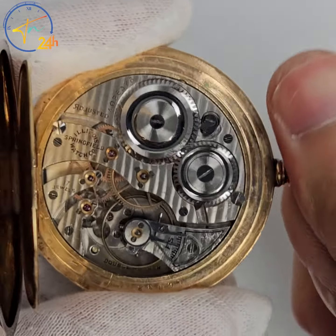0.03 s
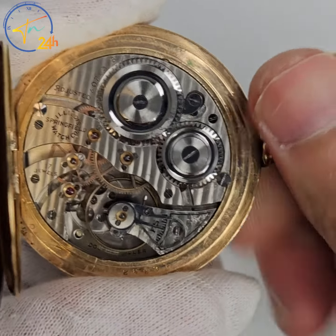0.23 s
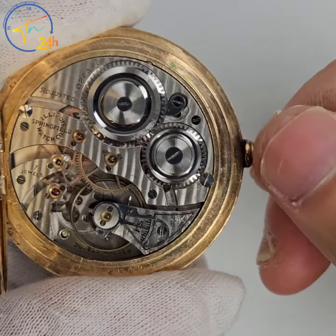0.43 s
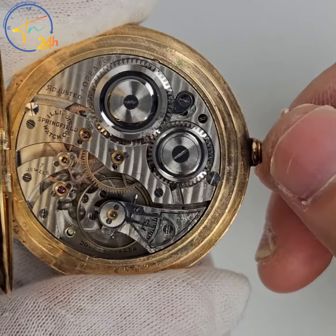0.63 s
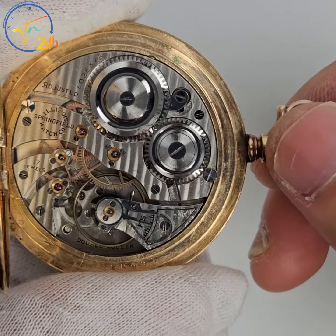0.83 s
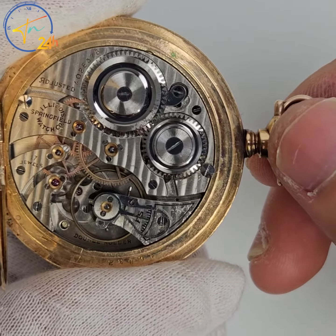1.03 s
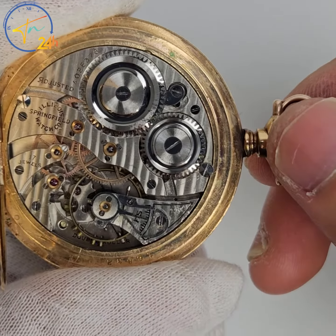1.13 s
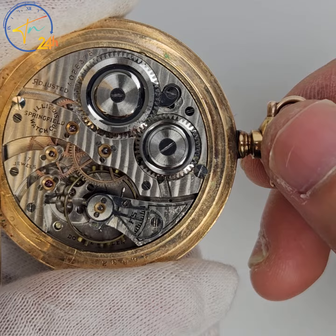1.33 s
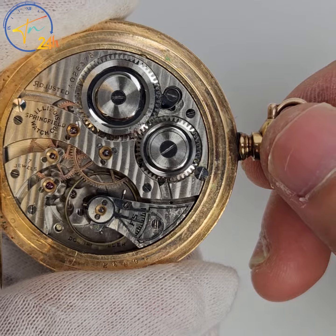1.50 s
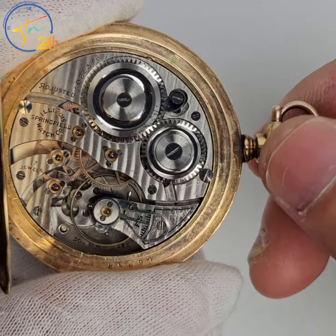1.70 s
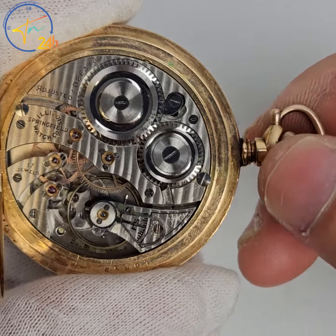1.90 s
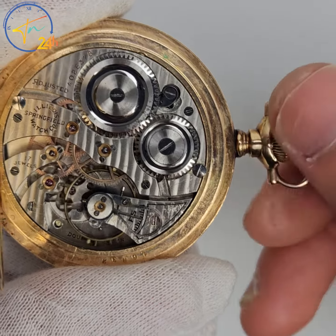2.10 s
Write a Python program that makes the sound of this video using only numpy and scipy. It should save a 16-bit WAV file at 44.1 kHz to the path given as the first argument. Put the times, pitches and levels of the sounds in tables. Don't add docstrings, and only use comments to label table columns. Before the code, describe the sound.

A metal pocket watch is handled close to a stereo microphone in a quiet room. Soft finger rubbing leads to a loud, sharp crown snap at 0.17 s, with a brief bright case ring. Faint, fast, overlapping ticks continue over low ventilation hum and thin hiss. At 1.70 and 1.87 s the loose bow makes two much quieter metallic knocks, with light touches and a barely audible distant bell-like tone from 1.74 s.

```python
import sys
import numpy as np
from scipy import signal
from scipy.fft import rfft, irfft
from scipy.io import wavfile

SR = 44100
rng = np.random.default_rng(int(sys.argv[2]) if len(sys.argv) > 2 else 0)


def wav_record(signal):
    frames = np.transpose(np.atleast_2d(signal))
    bounded = np.clip(frames, -1, 1)
    quanta = np.round(bounded * 32767).astype(np.int16)
    wavfile.write(sys.argv[1], SR, quanta)


def to_linear_factor(level_db):
    exponent = np.asarray(level_db, float) / 20
    return 10 ** exponent


N = 94815
MID_SIDE = np.array([[1], [-1]])


def rms_one(x):
    return x / np.sqrt(np.mean(x ** 2) + 1e-20)


def at_hz(points, hz):
    table_hz, value = np.transpose(points)
    return np.interp(np.log(hz), np.log(table_hz), value)


def pan(db):
    half_db = np.asarray(db) / 2
    return to_linear_factor(np.array([half_db, -half_db]))


def train(s, gains):
    out = np.full((2, N), 1e-18)
    index = np.clip((np.ravel(s) * SR).astype(int), 0, N - 1)
    for c in (0, 1):
        np.add.at(out[c], index, np.ravel(gains[c]))
    return out


def ring(clicks, hz, t60_s):
    r, w = to_linear_factor(-60 / (t60_s * SR)), 2 * np.pi * hz / SR
    return signal.lfilter([0, np.sin(w)], [1, -2 * r * np.cos(w), r * r], clicks)


def fade(clicks, t60_s):
    return signal.lfilter([1], [1, -to_linear_factor(-60 / (t60_s * SR))], clicks)


def coloured(spectrum, likeness=None):
    hz = np.maximum(np.arange(N // 2 + 1) * SR / N, 1)
    mid, side = rfft(rng.standard_normal((2, N)))
    alike = 0 if likeness is None else np.clip(at_hz(likeness, hz), -1, 1)
    pair = np.sqrt(1 + alike) * mid + np.sqrt(1 - alike) * side * MID_SIDE
    return rms_one(irfft(pair * to_linear_factor(at_hz(spectrum, hz)), N))


def drift(rate_hz):
    r = np.exp(-2 * np.pi * rate_hz / SR)
    warm_up = 9000
    walk = signal.lfilter([1], [1, -2 * r, r * r], rng.standard_normal(N + warm_up))
    return rms_one(walk[warm_up:])


def dulled(x):
    return signal.sosfilt(signal.cheby1(10, 1, 15850, fs=SR, output="sos"), x)


# (frequency [Hz], density [dB per Hz])
DRONE = [(15, -48.5), (25, -31.5), (188, -23.5), (257, 3), (377, -20.5), (457, -14), (516, -33.5),
         (647, -23.5), (1600, -35.5), (2080, -64.5), (3520, -120)]
# (frequency [Hz], width [Hz], level [dB])
DUCT_MODES = [(242, 25, -84.5), (276, 17, -77.5), (331.5, 29, -81.5), (436, 78, -92), (1005, 71, -92),
              (650, 26, -95)]
# (frequency [Hz], density [dB per Hz])
AIR_HISS = [(710, -39), (1200, -4), (5180, -8.5), (5650, -2.5), (6370, -9.5), (7330, 5.5), (10700, -16),
            (11800, -4.5), (16000, -1.5)]
# (frequency [Hz], left-right likeness [0 to 1])
DRONE_LIKENESS = [(60, 0.2), (290, 0.7), (640, 0.14), (1400, .02)]
# (time [s], level [dB])
AIRFLOW = [
    (0.0, -63.5),
    (0.731, -73.5),
    (1.39, -66.5),
    (1.61, -86),
    (1.69, -58),
    (1.72, -68.5),
    (2.15, -77),
]


def ventilation():
    ducts = 0
    for hz, width_hz, db in DUCT_MODES:
        mid, side = ring(rng.standard_normal((2, N + 4000)), hz, 2.3 / width_hz)[:, 4000:]
        ducts = ducts + to_linear_factor(db) * rms_one(mid + 0.36 * side * MID_SIDE)
    s, db = np.transpose(AIRFLOW)
    flow_db = np.interp(np.arange(N) / SR, s, db - db.mean())
    ducts = ducts * to_linear_factor(0.44 * flow_db + 4.8 * drift(6.7))
    rumble = to_linear_factor(-71) * coloured(list(DRONE) + [(3000, -71.5)], DRONE_LIKENESS)
    hiss = dulled(coloured([(500, -43.5)] + list(AIR_HISS)))
    hiss = to_linear_factor(-76 + 2.2 * drift(5.7)) * hiss
    return (ducts + rumble) * pan(-2.5)[:, None] + hiss * pan(-4.5)[:, None]


# (time [s], level [dB])
RUB_LEVEL = [(0, -59.5), (0.041, -64), (.12, -68.5), (0.136, -73), (0.152, -49.5), (0.171, -61), (.3, -82),
             (0.451, -82), (1.678, -83), (1.699, -49), (1.76, -79), (1.85, -71), (1.87, -53),
             (1.999, -88.5), (2.15, -72.5)]
# (frequency [Hz], density [dB per Hz])
RUB_SPECTRUM = [(1180, -59.5), (2000, -31), (2610, -10), (3140, -4), (3250, -18), (5820, -5), (14500, -8.5),
                (15800, -2), (16500, -29.5)]


def fingers():
    s, db = np.transpose(RUB_LEVEL)
    level = to_linear_factor(np.interp(np.arange(N) / SR, s, db) + 1.6 * drift(89))
    hiss = dulled(coloured(RUB_SPECTRUM))
    case_mode = rms_one(ring(rng.standard_normal((2, N)), 2750, 0.0069))
    return level * (hiss + to_linear_factor(-15.5) * case_mode)


# (frequency [Hz], density [dB per Hz])
TICK_SPECTRUM = [(2000, -24.5), (4600, -15.5), (5700, -11.5), (7400, -3), (10400, -8), (12000, 2.5),
                 (15500, 1.5)]


def watch(ticks, modes, lr_db, ring_db, hiss_db, hiss_t60_s, tail_db, next_s, next_db):
    s, db = np.transpose(ticks)
    s, db = np.append(s, s + next_s), np.append(db, db + next_db)
    sides = pan(lr_db)[:, None]
    hits = train(s + 0.00026, sides * to_linear_factor(db))
    grit = rms_one(rng.standard_normal((2, N)) + rng.standard_normal(N))
    luck_db = 5.5 * rng.standard_normal((len(s), len(modes)))
    plates = 0
    for k, (hz, level_db, t60_s) in enumerate(modes):
        clicks = train(s, sides * to_linear_factor(db + ring_db + level_db + luck_db[:, k]))
        plates = plates + ring(grit * fade(clicks, 0.016), hz, t60_s)
    noise = coloured(TICK_SPECTRUM)
    puff = to_linear_factor(hiss_db - 3) * fade(hits, 0.00067) * noise
    tail = to_linear_factor(hiss_db) * fade(hits, hiss_t60_s) + to_linear_factor(tail_db) * fade(hits, 0.12)
    return plates + puff + tail * dulled(noise)


# (time [s], peak [dB])
D_TICKS = [(0.0521, -53), (0.449, -50), (0.635, -59), (0.833, -56), (0.8472, -46.5), (0.8796, -69),
           (1.034, -58), (1.0596, -70), (1.2323, -52), (1.2417, -55), (1.4368, -58.5), (1.6323, -60),
           (1.8387, -80)]
# (frequency [Hz], level [dB], t60 [s])
D_MODES = [(2943, -13.5, 0.054), (4040, -5.5, 0.023), (4600, -22, 0.027), (12500, -17, 0.015),
           (14600, -12, 0.019), (15400, -8, 0.011)]


def movement_d():
    return watch(D_TICKS, D_MODES, lr_db=-1.5, ring_db=-26.5, hiss_db=-4, hiss_t60_s=0.045,
                 tail_db=-19, next_s=0.032, next_db=-5.5)


# (time [s], peak [dB])
A_TICKS = [
    (0.099, -60),
    (0.3009, -62),
    (0.4997, -57.5),
    (0.6994, -65.5),
    (0.8996, -58),
    (1.0979, -60.5),
    (1.2978, -58),
    (1.498, -62.5),
    (2.099, -59.5),
]
# (frequency [Hz], level [dB], t60 [s])
A_MODES = [(5920, -8.5, 0.036), (5720, -3.5, 0.024), (7100, -12.5, 0.022), (8600, -15, 0.012)]


def movement_a():
    return watch(A_TICKS, A_MODES, lr_db=-10.5, ring_db=-17.5, hiss_db=-7.5, hiss_t60_s=0.056,
                 tail_db=-22, next_s=-0.00028, next_db=-8.5)


def strike(rows, modes, colour, rattle_s, loss_db, modes_db, crack_db, crack_t60_s, after_db, after_t60_s,
           tail_db, thump_db, spike_db, cut_hz):
    s, db, lr_db = np.transpose(rows)
    sides = pan(lr_db)
    steps = np.arange(6) / 5
    when = s[:, None] + .001 + rattle_s * (steps + rng.uniform(0, .15, (len(s), 6)))
    out, hum = 0, 0
    for hz, level_db, t60_s, lean_db in modes:
        hum = hum + to_linear_factor(level_db) * rms_one(ring(rng.standard_normal((2, N)), hz, t60_s / 2))
        size_db = db[:, None] + modes_db + level_db - loss_db * steps
        size = to_linear_factor(size_db + rng.normal(0, 0.37, when.shape))
        lean = pan(lean_db + rng.normal(0, 1))[:, None]
        clicks = train(when, sides[:, :, None] * size * rng.choice([-1, 1], when.shape))
        out = out + lean * ring(clicks, hz, min(t60_s, 0.07))
    hits, noise = train(s + 0.0013, sides * to_linear_factor(db)), coloured(colour)
    hum = rms_one(hum) + 0.97 * noise
    out = out + to_linear_factor(crack_db) * fade(hits, crack_t60_s) * noise[0]
    out = out + to_linear_factor(after_db) * fade(hits, after_t60_s) * hum * to_linear_factor(1.9 * drift(280))
    room = fade(fade(hits, 0.42), 0.017) / (0.0066 * SR)
    out = out + to_linear_factor(tail_db) * room * dulled(hum)
    out = out + to_linear_factor(spike_db) * ring(train(s + .0016, sides * to_linear_factor(db)), 9000, 0.00029)
    out = signal.sosfilt(signal.butter(8, cut_hz, "high", fs=SR, output="sos"), out)
    thump = ring(hits, 880, .0022)
    out = out + to_linear_factor(thump_db) * signal.sosfilt(signal.butter(2, 70, "high", fs=SR, output="sos"), thump)
    left_lag_s = -.00016
    out[0] = np.interp(np.arange(N) - left_lag_s * SR, np.arange(N), out[0])
    return out


# (time [s], peak [dB], left-right [dB])
CASE_TOUCHES = [
    (0.149, -48.5, 4),
    (0.199, -38, -7),
    (1.6996, -45, 13),
    (1.7052, -35.5, 2.5),
    (1.747, -51, -8.5),
    (1.903, -52, -1),
]
# (time [s], peak [dB], left-right [dB])
BOW_KNOCKS = [
    (1.7024, -23.5, -4.5),
    (1.8677, -22.5, -8),
]
# (frequency [Hz], level [dB], t60 [s], left-right [dB])
BOW_MODES = [(1800, -11, 0.0086, -6), (3000, -0.5, 0.023, -0.5), (3810, -0.5, 0.01, 3),
             (4700, -5, 0.0042, 3.5), (6010, -6, 0.01, -7), (7250, -6, 0.012, 2.5),
             (9000, -12.5, 0.017, -1.5), (11990, -1.5, 0.013, -3), (13160, -3.5, 0.012, 4),
             (14400, -2, .012, -8)]
# (frequency [Hz], density [dB per Hz])
KNOCK_SPECTRUM = [(710, -45), (1200, -12.5), (6020, -6), (9030, -7.5), (12100, -6), (14900, -8.5),
                  (16500, -19)]


def touches_and_knocks():
    return strike(list(BOW_KNOCKS) + list(CASE_TOUCHES), BOW_MODES, KNOCK_SPECTRUM, rattle_s=.0022,
                  loss_db=12.5, modes_db=-13.0, crack_db=-4, crack_t60_s=0.0033, after_db=-18.5,
                  after_t60_s=0.043, tail_db=-35.5, thump_db=-14, spike_db=1.0, cut_hz=1750)


# (time [s], peak [dB], left-right [dB])
CROWN_SNAPS = [
    (0.1712, -6, 1.5),
]
# (frequency [Hz], level [dB], t60 [s], left-right [dB])
CASE_MODES = [(999, -19.5, 0.046, -3), (1660, -4, .011, 3), (2723, -2.5, 0.032, 7), (3050, -4, 0.018, -0.5),
              (4790, -16, 0.05, 7.5), (5460, -15, 0.065, -1.5), (5710, 2, 0.018, -3), (6120, -0.5, 0.02, 5),
              (7560, -11, 0.058, -1), (9480, -3.5, 0.02, 2.5), (11880, -4.5, 0.02, -9.5),
              (12800, -11.5, .04, 4), (13700, -12, .03, 4.5), (14300, -4.5, 0.02, -8.5)]
# (frequency [Hz], density [dB per Hz])
SNAP_SPECTRUM = [(470, -55.5), (1200, -44), (1590, -21), (2840, -9.5), (3600, -21.5), (5840, -11.5),
                 (8600, -19), (15100, -8), (16500, -29)]


def crown_snap():
    return strike(CROWN_SNAPS, CASE_MODES, SNAP_SPECTRUM, rattle_s=.002, loss_db=49, modes_db=-16.0,
                  crack_db=-12.5, crack_t60_s=0.0092, after_db=-20, after_t60_s=0.047, tail_db=-35.5,
                  thump_db=-59.5, spike_db=2.0, cut_hz=1160)


# (time [s], peak [dB])
B_TICKS = [
    (0.3508, -61),
    (0.5486, -53.5),
    (0.7504, -64.5),
    (0.9476, -56),
    (1.1499, -55),
    (1.3485, -58),
    (1.55, -58),
    (1.949, -66),
]
# (time [s], peak [dB])
B_DROPS = [
    (0.3598, -57),
    (0.5638, -53.5),
    (0.76, -52),
    (0.964, -54),
    (1.1626, -57.5),
    (1.366, -52.5),
    (1.5634, -58),
    (1.7662, -47),
    (1.9627, -52.5),
]
# (frequency [Hz], level [dB], t60 [s])
B_MODES = [(2384, -21, 0.047), (5740, -7, 0.045), (7360, 0, 0.01), (7450, -4.5, 0.0089), (8840, -12, 0.023)]


def movement_b():
    ticks = watch(B_TICKS, B_MODES, lr_db=-12.5, ring_db=-26.0, hiss_db=-11, hiss_t60_s=0.017,
                  tail_db=-28.0, next_s=0.01, next_db=-7.0)
    drops = watch(B_DROPS, B_MODES, lr_db=-9.5, ring_db=-26.0, hiss_db=-6.5, hiss_t60_s=0.02,
                  tail_db=-19.5, next_s=0.018, next_db=-8)
    return ticks + drops


# (time [s], peak [dB])
C_TICKS = [
    (0.405, -52.5),
    (0.5922, -51.5),
    (0.8017, -52),
    (0.9881, -52.5),
    (1.1941, -51.5),
    (1.3809, -50.5),
    (1.5894, -52),
    (1.7828, -48),
    (1.9902, -51),
]
# (frequency [Hz], level [dB], t60 [s])
C_MODES = [(3030, -22, 0.052), (9050, -1, .012), (10100, 1.5, 0.017), (11440, -1.5, 0.02),
           (15000, -17, 0.012)]


def movement_c():
    return watch(C_TICKS, C_MODES, lr_db=-2.0, ring_db=-24.0, hiss_db=-7.5, hiss_t60_s=0.057,
                 tail_db=-15.0, next_s=0.015, next_db=-10)


# (struck [s], frequency [Hz], level [dB], t60 [s])
BELL_PARTIALS = [
    (1.74, 2214, -70.5, 1.7),
    (1.80, 2214.5, -66, .3),
    (1.80, 1112, -77, 1.3),
]


def bell():
    t, rise_s = np.arange(N) / SR, 0.035
    out = 0
    for s, hz, db, t60_s in BELL_PARTIALS:
        swell = (t > s) * (1 - np.exp(-np.abs(t - s) / rise_s))
        out = out + to_linear_factor(db - 60 * (t - s) / t60_s) * swell * np.sin(2 * np.pi * hz * t)
    return out * pan(-3.4)[:, None]


def scene():
    held_watch = fingers() + touches_and_knocks() + crown_snap()
    movements = movement_d() + movement_a() + movement_b() + movement_c()
    return ventilation() + held_watch + movements + bell()


def top_cut(x):
    return signal.sosfilt(signal.butter(12, 16660, fs=SR, output="sos"), x)


def record(dry):
    mix = signal.sosfilt(signal.cheby2(22, 70, 16750, fs=SR, output="sos"), dry)
    return top_cut(mix)


dry = scene()
out = record(dry)
wav_record(out)
```